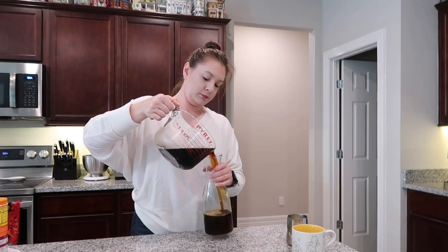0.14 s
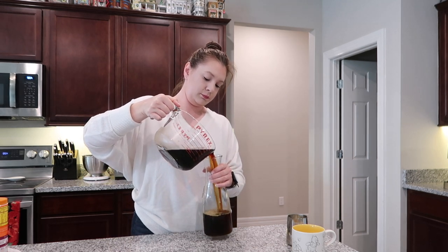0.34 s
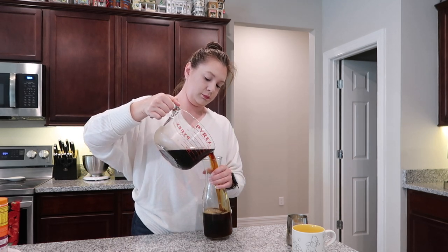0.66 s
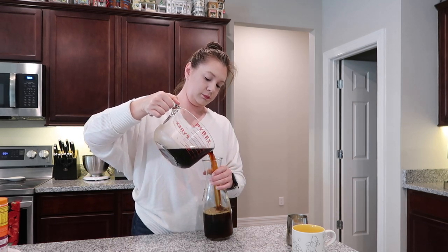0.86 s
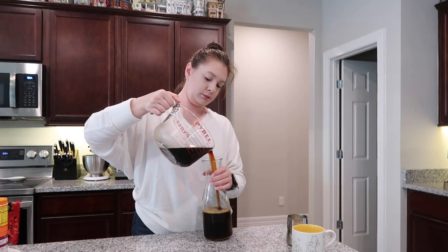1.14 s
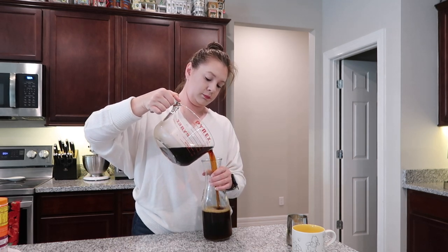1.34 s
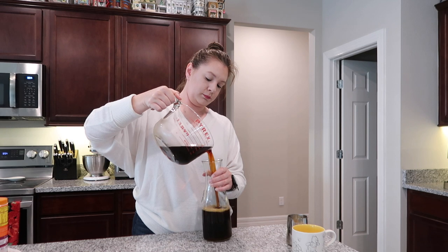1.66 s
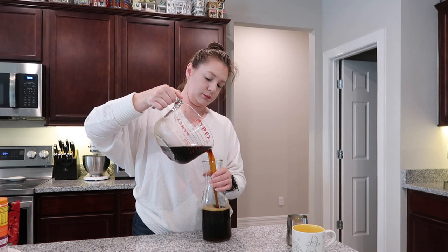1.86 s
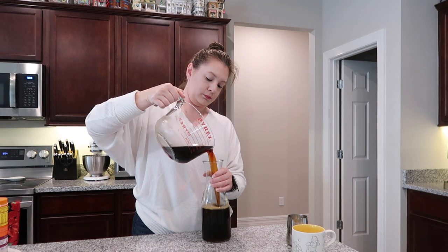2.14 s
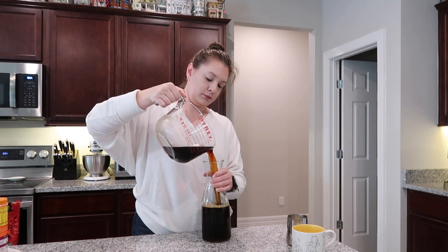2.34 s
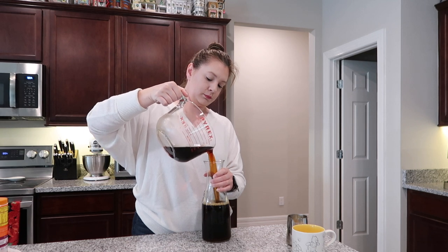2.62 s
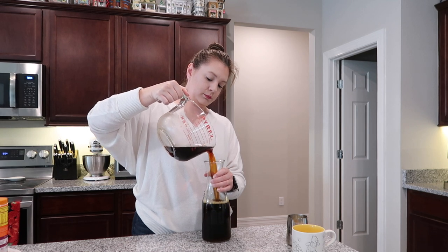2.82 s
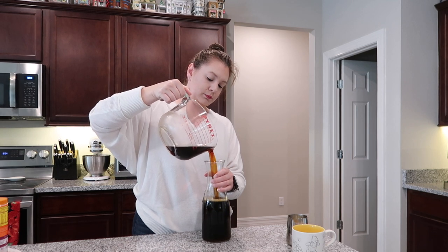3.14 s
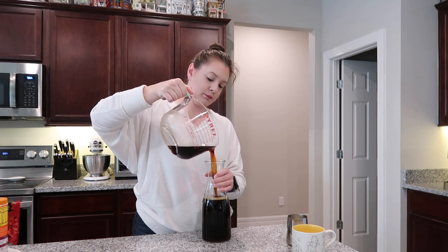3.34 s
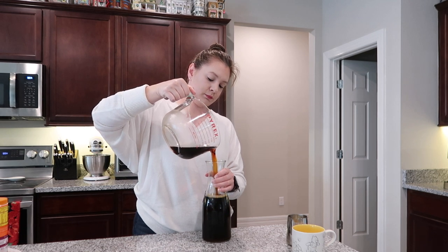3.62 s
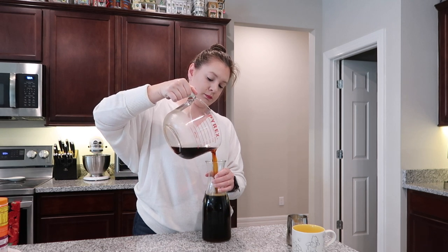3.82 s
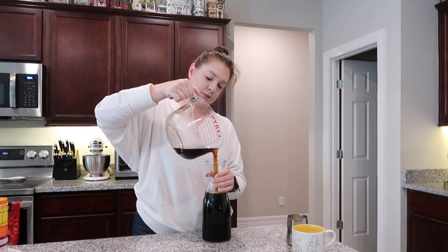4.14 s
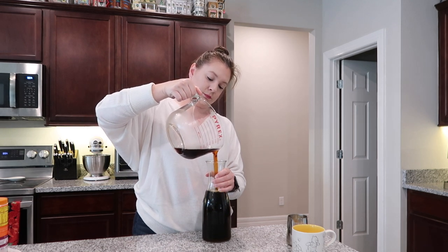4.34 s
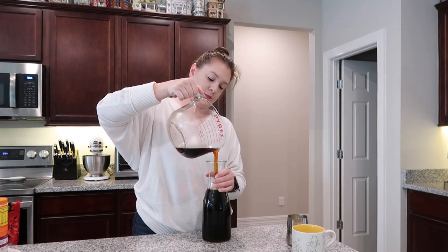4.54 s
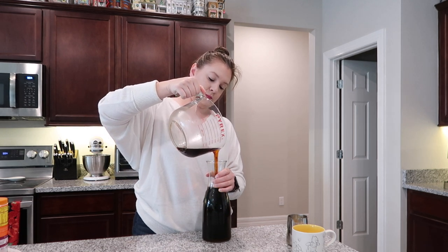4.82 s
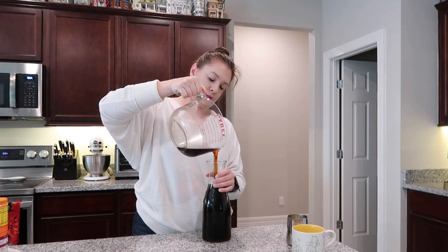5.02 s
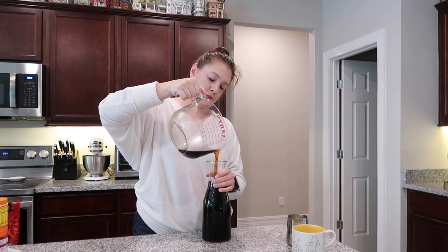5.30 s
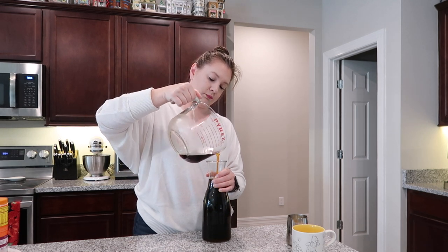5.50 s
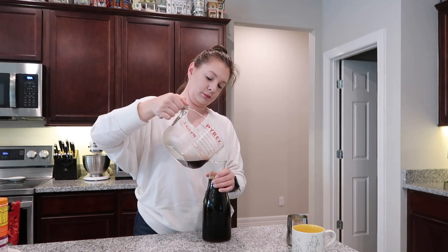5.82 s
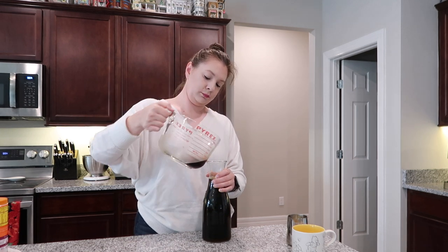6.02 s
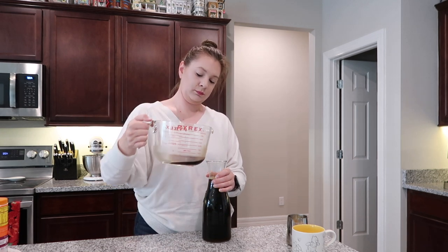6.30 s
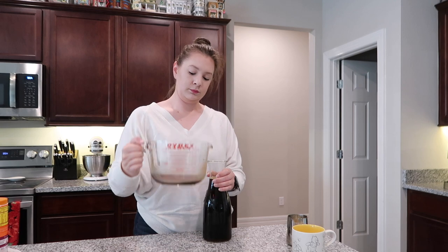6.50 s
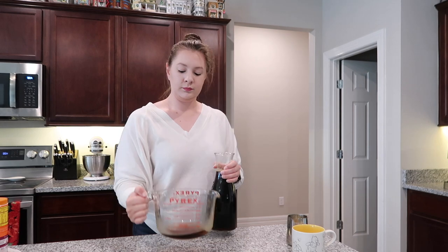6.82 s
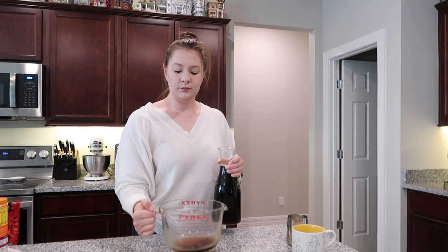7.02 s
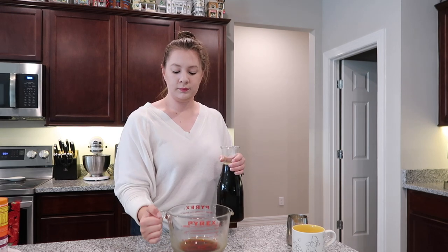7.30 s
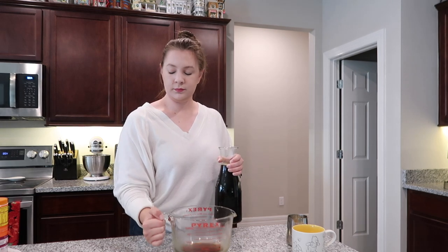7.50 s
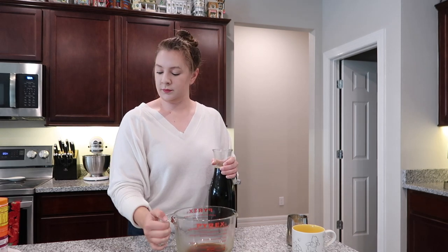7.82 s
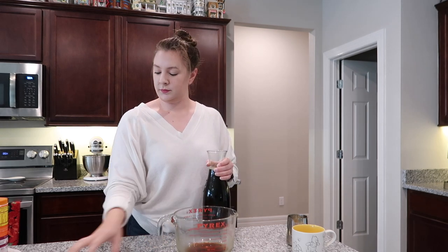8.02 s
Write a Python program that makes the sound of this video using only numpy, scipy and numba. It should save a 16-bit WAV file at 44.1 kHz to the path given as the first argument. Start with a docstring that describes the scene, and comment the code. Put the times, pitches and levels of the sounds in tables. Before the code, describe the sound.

Coffee glugs and splashes from a glass jug into a narrow-necked glass carafe, pitch climbing as it fills, then the jug knocks down on stone.

```python
"""A kitchen, heard by a camera microphone two metres off: a fridge hums throughout, as pitched lines over hiss.
Coffee runs from a glass jug into a narrow-necked carafe; noise excites its air modes, which mostly climb.
Decaying tones make the glugging air pockets, plinking bubbles and drops; bursts of noise make the slaps.
The pour stops, faint ticks follow, then the jug is set on stone and rocks once, ringing its modes.
Echoes surround the near sounds, and the camera's gain control ducks after loud peaks such as the knocks."""
import sys
import numpy as np
from scipy import signal
from scipy.fft import rfft, irfft
from scipy.io import wavfile
from scipy.ndimage import uniform_filter1d
from numba import njit

SR = 44100
rng = np.random.default_rng(int(sys.argv[2]) if len(sys.argv) > 2 else 0)


def dump_mix(stems):
    """Bounce the given channels to the path in sys.argv[1] as a 16-bit WAV at rate SR."""
    frames = np.atleast_2d(stems).T  # one column per channel
    limited = np.clip(frames, -1, 1)  # hard clip at full scale
    pcm = np.round(limited * 32767).astype(np.int16)
    wavfile.write(sys.argv[1], SR, pcm)


N = 359415


def undb(db):
    """Amplitude gain of a level in dB."""
    return 10 ** (np.asarray(db) / 20)


def level(x, db):
    """Scale a signal to an rms level in dB."""
    return x * undb(db) / np.sqrt(np.mean(x ** 2))


def along(table, x):
    """Interpolate the later columns of a table at positions x in its first."""
    at, *columns = np.transpose(table)
    return [np.interp(x, at, c) for c in columns]


def colour(x, points):
    """Filter by points (frequency [Hz], gain [dB]) joined on a log-frequency axis."""
    hz, db = np.transpose(points)
    f = np.maximum(np.fft.rfftfreq(N, 1 / SR), 1)
    return irfft(rfft(x) * undb(np.interp(np.log(f), np.log(hz), db)), N)


@njit
def svf(x, hz, width):
    """State-variable band-pass with a moving centre, where its gain is 1."""
    y, b, l = np.empty(len(x)), 0., 0.
    for i in range(len(x)):
        g, k = np.tan(np.pi * hz[i] / SR), width / hz[i]
        v = (b + g * (x[i] - l)) / (1 + g * (g + k))
        b, l, y[i] = 2 * v - b, l + 2 * g * v, k * v
    return y


def band(x, hz, width):
    """The same band-pass with a fixed centre."""
    return svf(x, np.full(N, float(hz)), float(width))


@njit
def follow(x, attack, release):
    """Peak follower that moves by a share of the difference each sample."""
    e, out = 0., np.empty(len(x))
    for i in range(len(x)):
        e += (x[i] - e) * (attack if x[i] > e else release)
        out[i] = e
    return out


def add(out, s, db, hz, t60, glide=0., rise=0.0012, soft=1):
    """Add one decaying tone at s [s]; glide raises its pitch, soft rounds its onset."""
    start, t60 = int(s * SR), max(t60, .0005)
    t = np.arange(min(int(t60 * SR), N - start)) / SR
    onset = (1 - np.exp(-t / rise)) ** soft
    shape = np.exp(-np.log(1000) * t / t60) * onset
    tone = np.sin(2 * np.pi * hz * t * (1 + glide * t / t60))
    out[start:start + len(t)] += undb(db) * shape / shape.max() * tone


def walk(rate):
    """Random values drawn rate times a second and joined by ramps; spread near 1."""
    k = int(SR / rate)
    return uniform_filter1d(np.repeat(rng.standard_normal(N // k + 1), k), k)[:N]


def highpass(x, hz):
    """Second-order high-pass."""
    return signal.sosfilt(signal.butter(2, hz, "high", fs=SR, output="sos"), x)


def delay(x, s):
    """Shift later by s seconds."""
    return np.pad(x, (int(s * SR), 0))[:N]


# fridge lines: (frequency [Hz], rms level [dB])
FRIDGE_LINES = [(59.2, -55.5), (296.5, -46.5), (507, -60.5)]
# colour of the room hiss: (frequency [Hz], relative level [dB])
HISS_COLOUR = [(15, -29), (25, -21), (60, -2.5), (80, -12.5), (105, -5), (215, -11.5), (297, -11.5),
               (349, -13.5), (509, -13.5), (567, -18), (1170, -22), (1570, -26), (4870, -34.5),
               (10400, -44.5), (15500, -50.5)]
# width of the hiss: (frequency [Hz], side minus mid [dB])
HISS_WIDTH = [(60, -20), (110, -15), (200, -3.5), (380, -2), (700, -3.5), (1290, -2.5), (2380, -3.5),
              (4400, 1.5), (8120, -1.5), (15000, 3.5)]
HISS_DB = -58  # rms of the mid hiss above about 600 Hz


def kitchen():
    """Fridge lines waver a little in pitch and level over a steady wide hiss; mid and side."""
    t = np.arange(N) / SR
    mid, side = (colour(rng.standard_normal(N), HISS_COLOUR) for _ in range(2))
    scale = undb(HISS_DB) / np.std(colour(mid, [(550, -80), (600, 0)]))
    mid, side = mid * scale, colour(side, HISS_WIDTH) * scale
    for hz, db in FRIDGE_LINES:
        drift = np.cumsum(walk(14)) / SR  # cycles
        wavering = np.sqrt(2) * undb(db + 0.38 * walk(10))
        mid = mid + wavering * np.sin(2 * np.pi * (hz * t + drift))
    return mid, side


# air above the coffee: (time [s], neck resonance [Hz], first and second lengthwise modes [Hz])
AIR_MODES = [(0, 250, 1230, 1780), (.8, 219, 1324, 1938), (1.6, 265, 1430, 2120), (2.47, 360, 1476, 2350),
             (2.9, 382, 1570, 2270), (3.35, 480, 1670, 2390), (3.75, 532, 1630, 3050),
             (3.92, 601, 1750, 3080), (4.5, 725, 2140, 3560), (5.2, 896, 2210, 3600), (6, 1184, 2200, 3640)]
# crosswise resonances: (frequency [Hz], width [Hz], relative level [dB])
CROSS_MODES = [(2390, 270, -9.5), (2543, 53, -6), (3176, 120, -5.5), (3440, 72, -1.5), (4640, 100, -28)]
# the stream: (time [s], splash level [dB], share in loose bubbles [0-1])
STREAM = [(0.0, -55, 0.8), (0.17, -57.5, 0.07), (0.39, -51, 0.14), (0.88, -51, 0.48), (1.84, -59, 0.28),
          (2.02, -59, 0.2), (2.44, -70.5, 0.9), (2.93, -55.5, 1), (3.08, -64.5, 0.8), (3.76, -60, 1),
          (4.31, -75, 0.96), (4.77, -61.5, 0.7), (5.0, -71, 0.8), (5.51, -62.5, 0.57), (5.71, -58.5, 0.8),
          (5.86, -81, 0.6), (6.05, -69, 0.9)]
PIPE_WIDTHS, PIPE_LEVELS = (60, 75), (11, 10)  # lengthwise modes [Hz], [dB]
HEAVE = .009  # spread of their pitch wander as the surface heaves [share]


def stream():
    """Uneven splashing drives the carafe's air modes; loose bubbles, gurgle and spray join in."""
    t = np.arange(N) / SR
    splash_db, loose = along(STREAM, t)
    loose = np.clip(loose, 0, 1)
    neck, *pipes = along(AIR_MODES, t)
    churn = rng.standard_normal(N) * undb(4 * walk(150) + 1.5 * walk(18))
    body = 0
    for hz, width, db in zip(pipes, PIPE_WIDTHS, PIPE_LEVELS):
        heaving = svf(churn, hz * (1 + HEAVE * walk(15)), float(width))
        body = body + undb(db + 1.3 * walk(45)) * heaving
    body = body * undb(-2.2 * t)  # building foam damps the lengthwise modes
    for hz, width, db in CROSS_MODES:
        body = body + undb(db + 8.3 * walk(22.23)) * band(churn, hz, width)
    body = level(band(body, 2200, 2300), 0.63)
    bunched = level(swarm(pipes) * undb(3 * walk(12)), 0.11)  # bubbles come in bunches
    splash = undb(splash_db) * (np.sqrt(1 - loose) * body + np.sqrt(loose) * bunched)
    return (splash + droplets()) * (t < STREAM[-1][0]) + gurgle(neck)


SWARM_COUNT, SWARM_SPREAD = 500 * 6, 0.107  # bubbles over the pour; pitch scatter [share]


def swarm(pipes):
    """Many small bubbles gather near the air modes and two fixed pitches; few are large."""
    out = np.zeros(N)
    for when, which, off, size in rng.random((SWARM_COUNT, 4)):
        s, group = when * STREAM[-1][0], int(which * 4)
        centre = (*(p[int(s * SR)] for p in pipes), 3500., 1300.)[group]
        hz = centre * np.exp(SWARM_SPREAD * np.log(off / (1 - off)))
        db = -3 * np.log(size) - 1.5 * group
        add(out, s, db, np.clip(hz, 500, 7000), 16. / hz, glide=.15)
    return out


# gurgle in the neck: (time [s], level before a 7.5 dB cut [dB])
GURGLE = [(0, -45), (.35, -42.5), (.65, -45.5), (1.1, -46.5), (2.36, -56), (2.47, -50), (2.58, -71),
          (2.78, -48.5), (2.95, -53), (3.15, -70), (3.33, -49.5), (3.6, -54), (3.72, -44), (3.84, -55),
          (3.92, -51), (4.02, -59), (4.3, -54), (4.55, -54), (4.9, -69), (5.6, -77), (5.72, -48),
          (5.95, -76)]


def gurgle(neck):
    """Fluttering noise passes twice through the narrow, moving neck resonance."""
    t = np.arange(N) / SR
    flutter = rng.standard_normal(N) * undb(1.2 * walk(20))
    ringing = level(svf(svf(flutter, neck, 40.), neck, 30.), -7.5)
    return undb(along(GURGLE, t)[0]) * ringing * (t < GURGLE[-1][0])


# fine droplets: (time [s], relative level [dB], finest drops' offset from it [dB])
DROPLETS = [(0, -43, -29), (.12, -51, -25), (.18, -42.5, -25), (.34, -41, -25), (.4, -45.5, -22),
            (.63, -58, -10), (.66, -39, -26), (.76, -43, -21), (.84, -56.5, -14), (1.35, -51, -24),
            (1.5, -54.5, -21), (2.21, -52, -23), (2.28, -61.5, -16), (4.66, -62, -14), (4.73, -54, -24),
            (4.9, -65, -24), (5.76, -69, -1), (5.9, -78, -8)]


def droplets():
    """Tiny drops hiss in four noise bands, one for each size, that flicker independently."""
    db, fine_db = along(DROPLETS, np.arange(N) / SR)
    bands = []
    for hz in (3320, 4870, 9900, 11800):
        grit = rng.standard_normal(N) * undb(2.5 * walk(200) + 2.5 * walk(14))
        bands.append(level(band(band(grit, hz, .5 * hz), hz, .5 * hz), 0))
    coarse = undb(-13.0) * bands[0] + undb(-22.5) * bands[1]
    fine = undb(fine_db - 7.0) * (bands[2] + bands[3])
    return undb(db) * (coarse + fine)


PLOP_COUNT, PLOP_DB, PLOP_SCATTER = 160 * 6, -52.5, 0.082  # number, loudest level, pitch scatter [share]


def plops():
    """Middling bubbles burst at random, each near a lengthwise mode or a crosswise one."""
    out, end = np.zeros(N), PLINKS[-1][0]
    for when, which, off, size in rng.random((PLOP_COUNT, 4)):
        s = when * end
        centre = (*along(AIR_MODES, s)[1:], CROSS_MODES[2][0])[int(which * 3)]
        hz = centre * (1 + PLOP_SCATTER * (4 * off - 2))
        add(out, s, PLOP_DB - 20. * size, hz, PLINK_CYCLES / hz, glide=0.013)
    return out


def cupboard(near):
    """An early echo off the cupboard doors, without its bass."""
    return undb(-5) * highpass(delay(near, .0076), 900)


def far_wall(sent):
    """One clear, dull echo through a band around 570 Hz."""
    return undb(-9) * band(delay(sent, .043), 570, 240)


# decay of the room: (band centre [Hz], t60 [s])
ROOM_DECAY = [(150, 0.6), (500, 0.55), (1500, 0.7), (4000, 0.11), (10000, 1)]
# colour of the tail's side: (frequency [Hz], gain [dB])
ROOM_SIDE_COLOUR = [(150, -5), (500, -4.5), (1200, 6.5), (3000, -3), (8000, 15)]
ROOM_DB, ROOM_SIDE_DB = -12.5, -19.5  # tail gain; the side's further gain before its colour


def room(x):
    """Tiled walls: a noise tail dies band by band over at most a second; mid and side."""
    t = np.arange(N) / SR
    onset = 1 - np.exp(-(t / 0.00015) ** 2)
    tails = []
    for _ in range(2):
        tail = 0
        for hz, t60 in ROOM_DECAY:
            decay = np.exp(-np.log(1000) * t / t60)
            tail = tail + band(rng.standard_normal(N), hz, 0.75 * hz) * decay
        tail = colour(tail * onset, [(100, 12.5), (1000, 8.0), (4000, 8.5), (12000, -7.5)])
        tail = tail[:SR] / np.sqrt(np.sum(tail ** 2))
        tails.append(signal.fftconvolve(x, tail)[:N])
    side = undb(ROOM_DB + ROOM_SIDE_DB) * colour(tails[1], ROOM_SIDE_COLOUR)
    return undb(ROOM_DB) * tails[0], side


# air pockets that burst: (time [s], peak level [dB], starting pitch [Hz], t60 [s])
AIR_POCKETS = [(0.061, -40, 234, 0.29), (0.202, -41.5, 313.6, 0.99), (0.249, -32.5, 232, 0.19),
               (0.335, -37, 238, 0.16), (0.454, -30, 252, 0.16), (0.509, -34.5, 265.3, 0.65),
               (0.6, -33, 257, 0.15), (0.636, -29.5, 246.6, 0.066), (0.662, -30, 239.5, 0.14),
               (0.748, -28.5, 270, 0.066), (0.83, -30.5, 280, 0.065), (0.913, -39.5, 294.3, 0.51),
               (1.577, -21.5, 304, 0.17), (1.668, -36.5, 310.7, 0.19), (1.854, -26, 308, 0.082),
               (1.905, -39, 311, 0.064), (1.942, -41.5, 325, 0.2), (2.43, -46, 355, .45),
               (2.48, -46, 363, .3), (3.315, -53, 486, .25), (3.7, -45.5, 536, 0.27),
               (3.91, -52, 603, 0.089)]


def glugs():
    """Big air pockets burst with a short deep note, a slap and a thud."""
    out = np.zeros(N)
    for s, db, hz, t60 in AIR_POCKETS:
        add(out, s, db, hz, t60, glide=0.021, rise=0.0044)
        add(out, s, db - 14.5, 2.56 * hz, .008)  # the slap of the closing cavity
        add(out, s, db - 11, 200, .07, rise=0.0011)  # the coffee heaves
    return out


# the clearest single bubbles: (time [s], peak level [dB], starting pitch [Hz])
PLINKS = [(.0832, -39, 3630), (.193, -40, 3300), (.2448, -39, 3380), (0.247, -42, 1310),
          (0.3039, -27.5, 1840), (0.311, -37, 1830), (.322, -34, 1860), (.365, -41, 1260), (.72, -36, 2020),
          (.76, -35, 2050), (.3277, -38, 3800), (0.6488, -35.5, 1314), (0.6546, -51, 3270),
          (0.6658, -35, 1970), (.6908, -32, 2020), (0.7126, -36, 3600), (0.743, -36, 3830),
          (1.042, -46, 1380), (1.07, -38, 2010), (1.163, -44, 2060), (1.187, -41, 3620), (1.27, -41, 3750),
          (1.291, -37, 2100), (1.1888, -36.5, 2460), (1.1905, -40, 2780), (1.2635, -42, 2110),
          (1.3492, -34, 3420), (1.4036, -39, 3100), (1.4196, -38, 1410), (1.6463, -37.5, 1420),
          (1.7547, -41.5, 3750), (1.8894, -40, 2240), (1.9061, -38, 2250), (2.1101, -45, 1410),
          (2.129, -41, 3320), (2.205, -40, 1460), (2.381, -37, 2150), (2.41, -36, 2330), (2.452, -47, 1790),
          (2.456, -44, 1300), (2.5147, -37.5, 2910), (2.528, -54, 2880), (2.775, -46, 1550),
          (3.105, -47, 1610), (3.17, -49, 1680), (2.591, -37.5, 1530), (2.6324, -45, 1480),
          (2.06, -44, 2000), (2.751, -36.5, 2050), (2.822, -36.5, 2030), (2.821, -34.5, 1560),
          (2.888, -36.5, 1720), (3.0396, -39.5, 2100), (3.042, -41, 1690), (3.354, -46, 865),
          (3.913, -45, 1335), (3.205, -40.5, 1740), (3.294, -36.5, 1750), (3.298, -43, 790),
          (3.332, -33.5, 1740), (3.406, -43, 1360), (3.4292, -41, 1780), (3.4558, -44, 2250),
          (3.699, -43, 3070), (4.036, -46.5, 1310), (3.511, -41, 2920), (3.569, -42.5, 1890),
          (3.5929, -37, 1980), (3.6783, -42, 1890), (3.7437, -35, 1940), (3.7842, -41, 3460),
          (3.7868, -33.5, 1630), (3.8596, -40, 2160), (3.898, -41, 1780), (3.9083, -41, 3000),
          (4.06, -43, 3020), (4.103, -39.5, 1950), (4.1245, -39.5, 2170), (4.2447, -40, 2350),
          (4.243, -46, 1930), (4.194, -47, 1340), (4.071, -47, 2000), (4.477, -46, 3160),
          (4.2426, -43, 3200), (4.4778, -35.5, 1980), (4.732, -46, 3620), (4.733, -30.5, 2230),
          (4.742, -53, 2160), (4.732, -51, 1330), (4.781, -47, 3100), (4.8268, -39, 2320),
          (5.023, -40, 3520), (5.03, -42, 2170), (5.0807, -42.5, 1990), (5.1708, -43, 1370),
          (5.2305, -41.5, 2060), (5.3319, -45, 3560), (5.54, -44, 2180), (5.612, -46, 1320),
          (5.659, -44, 1980), (5.666, -41, 2200), (5.672, -43, 3440), (5.667, -40, 1380), (5.67, -42, 2840),
          (5.676, -42, 1400), (5.69, -51, 1290), (5.696, -47, 2340), (5.72, -44, 3800),
          (5.762, -40.5, 1780), (5.775, -48, 1700), (5.68, -47, 1230), (5.7039, -40, 2200),
          (5.73, -34.5, 2080), (5.7535, -38, 1930), (5.757, -43, 1140), (5.753, -41, 2770),
          (5.782, -43, 1120), (5.788, -52, 1110), (5.837, -53, 1220)]
PLINK_CYCLES, SNAP_CYCLES = 24, 7  # cycles until 60 dB down
TRAIL, TRAIL_S, TRAIL_DB, TRAIL_SCATTER = 8, .07, -10, 0.14  # bubbles, span, loudest offset, pitch scatter


def bubbles():
    """Bubbles snap off, ring briefly and rise towards the surface; each drags weaker ones behind it."""
    out = np.zeros(N)
    for (s, db, hz), trail in zip(PLINKS, rng.random((len(PLINKS), TRAIL, 3))):
        add(out, s, db, hz, PLINK_CYCLES / hz, glide=0.042)
        add(out, s, db - 6, 1.27 * hz, SNAP_CYCLES / hz, rise=0.00011)  # pinching off
        for late, off, size in trail:
            small_s = s + .002 + TRAIL_S * late ** 2
            small_hz = hz * np.exp(TRAIL_SCATTER * (2 * off - 1))
            add(out, small_s, db + TRAIL_DB - 16.0 * size, small_hz, PLINK_CYCLES / small_hz, glide=0.1)
    return out


# slaps on the surface: (time [s], relative level [dB], finest spray's offset [dB], t60 [s])
SLAPS = [(0.193, -34, -17, 0.12), (0.2446, -33.5, -10, 0.2), (0.3027, -44, -17, 0.1),
         (0.317, -36, -15, 0.12), (0.334, -42, -17, 0.12), (0.6537, -29, -14, 0.087),
         (0.6914, -48, -14, 0.1), (0.7404, -30, -25, 0.098), (0.9985, -39, -11, 0.092),
         (1.191, -48, -25, 0.065), (1.2535, -41, -19, 0.22), (1.347, -44, -23, 0.084),
         (1.4042, -48, -22, 0.092), (1.7549, -43, -21, 0.07), (1.8494, -64, -9, 0.085),
         (2.048, -41, -21, 0.077), (2.1281, -38.5, -18, 0.14), (2.15, -39.5, -17, 0.078),
         (2.1897, -38.5, -17, 0.17), (2.383, -42, -17, 0.15), (2.408, -43, -17, 0.13),
         (2.4498, -46, -20, 0.11), (2.5137, -50, -19, 0.091), (2.5955, -44, -22, 0.091),
         (2.63, -37, -26, 0.072), (2.7513, -40, -20, 0.16), (2.822, -38, -14, 0.08),
         (2.8873, -49, -14, 0.1), (3.041, -40, -18, 0.094), (3.2944, -43.5, -12, 0.11),
         (3.454, -39, -20, 0.07), (3.5104, -48, -18, 0.1), (3.5924, -51, -14, 0.1), (3.678, -51, -14, 0.09),
         (3.698, -46, -9, 0.08), (3.7434, -48, -14, 0.086), (3.785, -42, -18, 0.088),
         (3.9095, -40, -19, 0.1), (4.0467, -39.5, -19, 0.12), (4.101, -42.5, -14, 0.1),
         (4.1904, -45, -18, 0.075), (4.2438, -46, -19, 0.087), (4.2911, -48, -14, 0.1),
         (4.3545, -39.5, -20, 0.18), (4.4767, -45, -16, 0.091), (4.5989, -44, -14, 0.11),
         (4.731, -40.5, -22, 0.066), (4.8259, -45, -14, 0.092), (4.9536, -42, -16, 0.081),
         (5.023, -44, -17, 0.079), (5.1704, -58, -14, 0.092), (5.333, -44, -23, 0.13),
         (5.5154, -44, -21, 0.1), (5.573, -41, -20, 0.11), (5.6106, -47, -14, 0.078),
         (5.659, -49, -14, 0.073), (5.7039, -50, -14, 0.1), (5.7194, -42, -14, 0.091),
         (5.7533, -44, -14, 0.091), (5.8366, -43, -19, 0.1)]
# where the carafe answers a slap: (frequency [Hz], width [Hz], relative level [dB])
SLAP_BANDS = [(2160, 120, 2), (3060, 160, 1), (3670, 320, 1), (5000, 160, -5)]
SLAP_DB, SLAP_PIPE_DB, SLAP_WIDTH_HZ = -16, 5, 120  # gain of all slaps; lengthwise modes' level, width


def slaps():
    """The stream slaps the surface: a sudden crackle through several air modes that dies fast."""
    t = np.arange(N) / SR
    body, fine = np.zeros(N), np.zeros(N)
    for s, db, fine_db, t60 in SLAPS:
        i = int(s * SR)
        fade = undb(db + SLAP_DB - 60 * t[:SR // 2] / max(t60, .02))
        body[i:i + SR // 2] += fade
        fine[i:i + SR // 2] += fade * undb(fine_db)

    def grit():
        return rng.standard_normal(N) * undb(3 * walk(300))

    rings = 0
    for hz, width, db in SLAP_BANDS:
        rings = rings + undb(db + 2.9 * walk(24.92)) * level(band(grit(), hz, width), 0)
    for hz in along(AIR_MODES, t)[1:]:
        rings = rings + level(svf(grit(), hz, float(SLAP_WIDTH_HZ)), SLAP_PIPE_DB)
    spray = level(band(band(grit(), 8000, 7800), 8000, 7800), 0)
    return body * rings / 2 + fine * spray


# drops and faint ticks: (time [s], level before the grains' cut [dB], pitch [Hz], spatter length [s])
DROPS = [(.2, -47, 6400, 0.022), (0.243, -34.5, 4770, 0.018), (0.251, -39, 8500, 0.021),
         (.298, -38, 5630, 0.037), (0.334, -33.5, 5240, 0.025), (.5207, -38, 12200, 0.017),
         (.6594, -38, 6370, 0.017), (.9527, -48, 9320, 0.022), (2.205, -44, 10100, 0.016),
         (2.83, -49, 8850, 0.018), (2.9746, -48, 9050, 0.017), (3.795, -52, 8110, .015),
         (4.2403, -47, 13500, .02), (4.292, -44, 4800, 0.016), (4.6254, -50, 9490, .015),
         (4.737, -43, 4740, 0.028), (5.7528, -46, 12500, .03), (6.77, -43, 2100, 0.0032),
         (6.771, -39.5, 3400, 0.0038), (6.778, -45, 7300, 0.0015), (6.982, -50, 3900, 0.0035),
         (7.221, -50, 3970, .003), (7.245, -58, 4500, .003), (7.465, -51, 3500, 0.0027)]
SPATTER, SPATTER_DB, TICK_CYCLES = 10, -9, 20  # grains per drop, their cut, cycles until 60 dB down


def ticks():
    """Each drop breaks into tiny tones of scattered pitch, crowded towards its start."""
    out = np.zeros(N)
    for (s, db, hz, lasts), grains in zip(DROPS, rng.random((len(DROPS), SPATTER, 2))):
        for late, off in grains:
            grain_hz = hz * np.exp(0.3 * (off - .5))
            add(out, s + lasts * late ** 2, db + SPATTER_DB, grain_hz, TICK_CYCLES / hz, rise=.0001)
    return out


# jug on stone: (time [s], blow level [dB], contact [s], extra for modes under 500 Hz [dB],
# over 1200 Hz [dB], lowest glass modes [dB], higher glass modes [dB], share of the glass's t60)
KNOCKS = [(7.5408, -1, 0.0012, 0, -1, 2, 0, 1), (7.7022, -6.5, 0.0014, -5, -4, -11, 7, .33)]
# jug and counter: (frequency [Hz], level relative to the blow [dB], t60 [s])
JUG_MODES = [(113, -25.5, 0.22), (371, -15, 0.11), (554, -13, 0.2), (586, -4.5, 0.022), (679, 6, 0.0069),
             (833, -18, 0.07), (1072, -16, 0.12), (1380, 0.5, 0.0078), (1417, -16, 0.092),
             (1664, -3.5, 0.026), (2005, -1.5, 0.0093), (2440, -5, 0.0072)]
# glass, split modes of alternating sign: (frequency [Hz], relative level [dB], t60 [s])
GLASS_MODES = [(3150, -16, .045), (3160, -39, .36), (3165, -41, .36), (5142, -29, .22), (5174, -31, .2),
               (5158, -50, 1.0), (6891, -46, .1)]
RING_RISE_S = .008  # the higher glass modes take up the blow slowly
HOLLOW_HZ, HOLLOW_WIDTH_HZ, HOLLOW_SHARE = 440, 70, .75  # neighbouring counter modes cancel here


def jug():
    """Each contact is a short push into the modes; a longer push dulls the high ones."""
    out, opposed = np.zeros(N), np.zeros(N)
    for s, db, contact, low_db, high_db, *ring_db, lasts in KNOCKS:
        def blow(hz):
            return db - 10 * np.log10(1 + (hz * contact) ** 2)

        for hz, mode_db, t60 in JUG_MODES:
            extra_db = low_db * (hz < 500) + high_db * (hz > 1200)
            add(out, s, blow(hz) + mode_db + extra_db, hz, t60, rise=contact, soft=2.35)
        for k, (hz, mode_db, t60) in enumerate(GLASS_MODES):
            higher = int(hz > 4000)
            mode_db = blow(hz) + mode_db + ring_db[higher]
            rise = RING_RISE_S * higher + contact
            add((out, opposed)[k % 2], s, mode_db, hz, t60 * lasts, rise=rise, soft=2)
    add(out, 7.842, -61, 3550, .38, rise=0.0041, soft=1.7)  # a thin late tone
    after = np.arange(N) / SR > KNOCKS[0][0] + .01
    roughness = undb(2.5 * walk(70) * after)  # the unsteady base roughens the ringing
    out = (out - opposed) * roughness + clatter()
    return out - HOLLOW_SHARE * band(out, HOLLOW_HZ, HOLLOW_WIDTH_HZ)


# base on stone: (frequency [Hz], width [Hz], level relative to the blow [dB], t60 [s])
CLATTER = [(690, 370, -16.5, .1), (1770, 410, -45.5, .1), (3950, 3400, -47, 0.27)]


def clatter():
    """The base chatters on the stone: rough noise swells just after each contact and dies quickly."""
    t, out = np.arange(N) / SR, 0
    for hz, width, db, t60 in CLATTER:
        rough = rng.standard_normal(N) * undb(4 * walk(120))
        rattle = level(band(band(rough, hz, width), hz, width), db)
        for s, blow_db, contact, *_ in KNOCKS:
            since = np.maximum(t - s, 0)
            swell = (1 - np.exp(-since / contact)) ** 2
            out = out + band(rattle * undb(blow_db - 60 * since / t60) * swell, hz, width)
    return out


GLUG_SEND_DB = -13  # gain of the glugs' send to the room and far wall [dB]; they sound drier
CUPBOARD_SIDE_DB = -16  # the cupboard echo comes from a little to the left: side minus mid


def scene():
    """Near sources in the middle, their echoes and the kitchen around them; left and right."""
    deep = glugs()
    near = stream() + plops() + deep + bubbles() + slaps() + ticks() + jug()
    near = highpass(near, 120)  # small things radiate no deep bass
    near = near + undb(0.6) * band(near, 215, 34)  # standing wave of the kitchen
    early = cupboard(near)
    near = near + early
    sent = near - (1 - undb(GLUG_SEND_DB)) * deep
    mid, side = np.array(room(sent)) + np.array(kitchen())
    mid = near + far_wall(sent) + mid
    side = side + undb(CUPBOARD_SIDE_DB) * early
    return np.array([mid + side, mid - side])


TOP_HZ = 15400  # upper limit of the camera's sound


def record(dry):
    """The camera ducks after loud peaks and recovers, rounds the loudest tips and cuts the top."""
    attack, release = 1 / (0.005 * SR), 1 / (.1 * SR)
    peak = follow(np.abs(dry).max(axis=0), attack, release)
    gain = np.minimum(1, (undb(-24) / (peak + 1e-9)) ** 0.24)
    rounded = 1.15 * np.tanh(dry * gain / 1.15)
    return signal.sosfilt(signal.ellip(10, .2, 80, TOP_HZ, fs=SR, output="sos"), rounded)


dry = scene()
out = record(dry)
dump_mix(out)
```